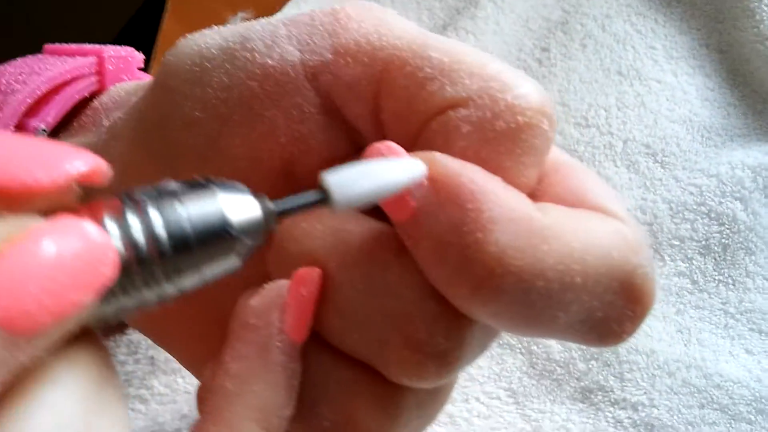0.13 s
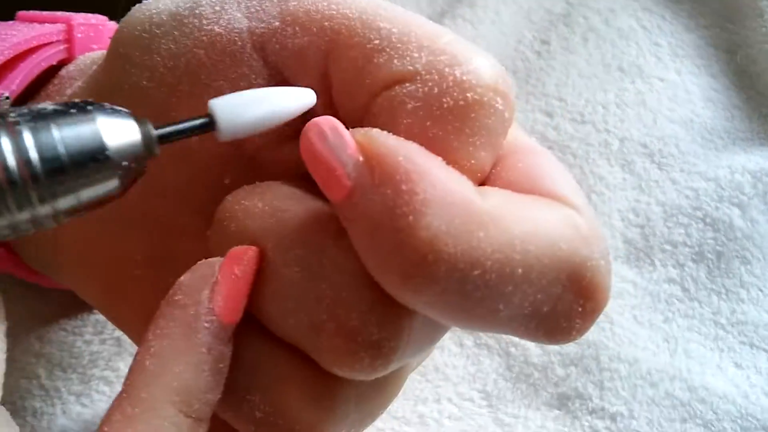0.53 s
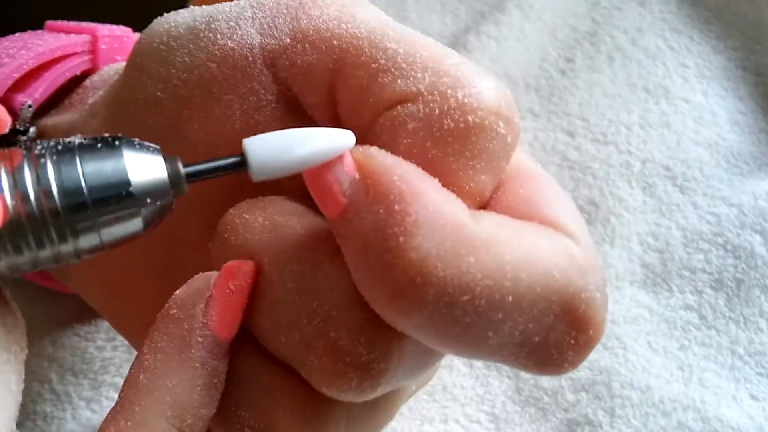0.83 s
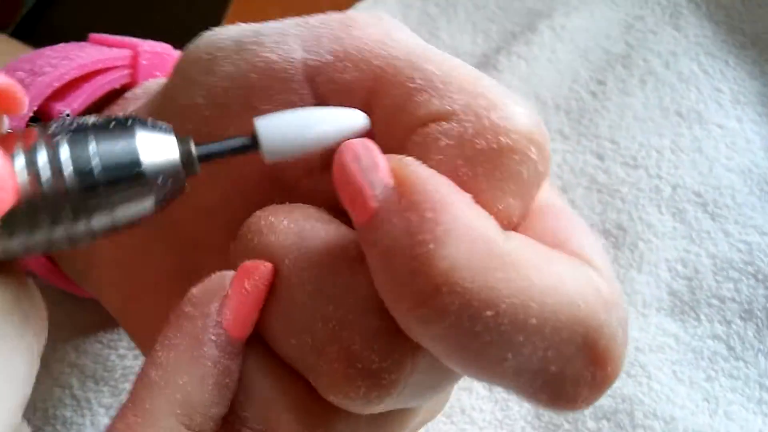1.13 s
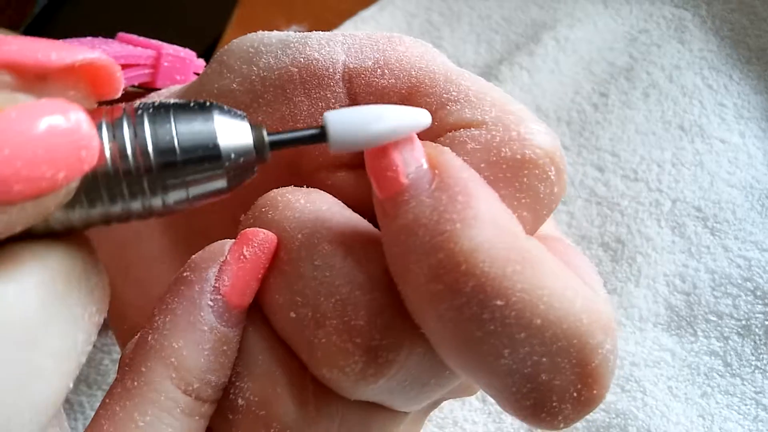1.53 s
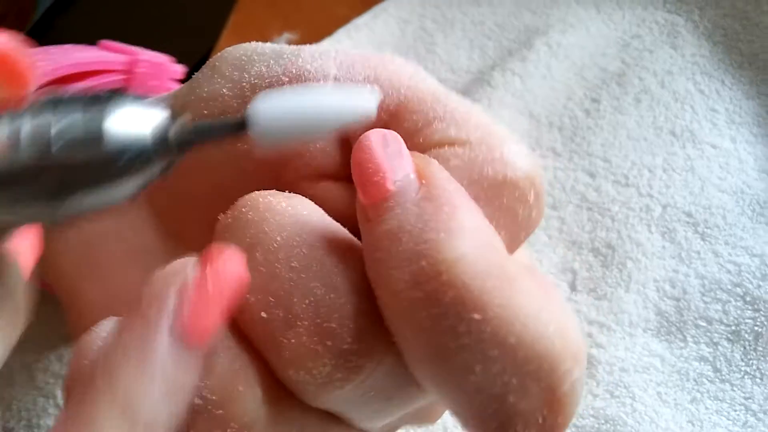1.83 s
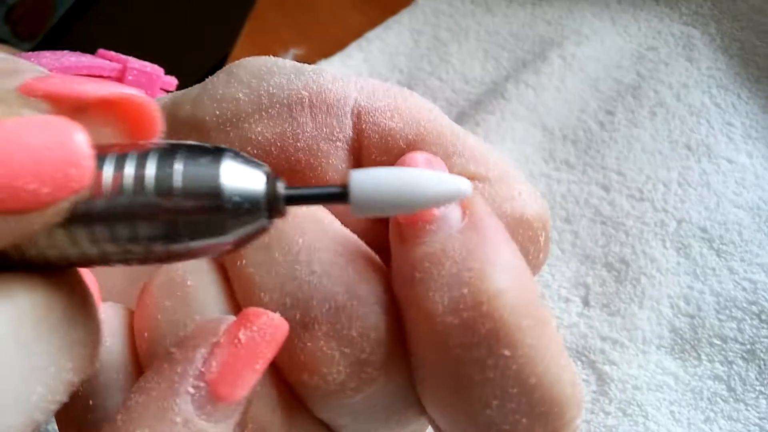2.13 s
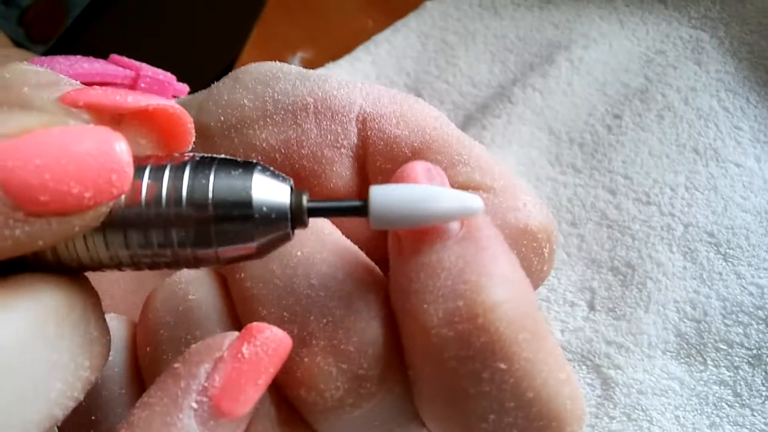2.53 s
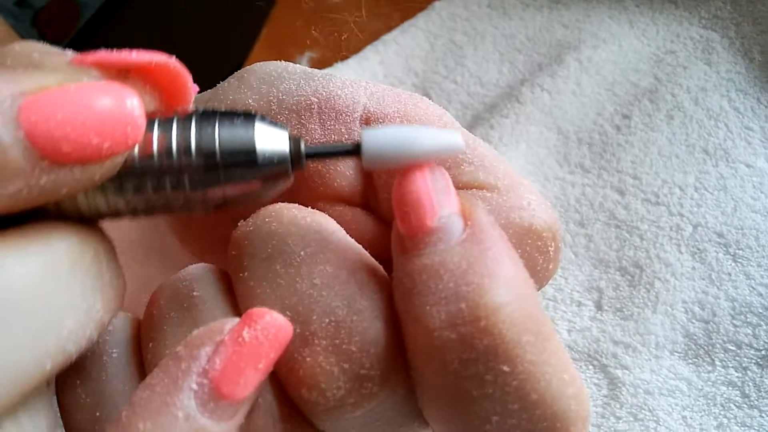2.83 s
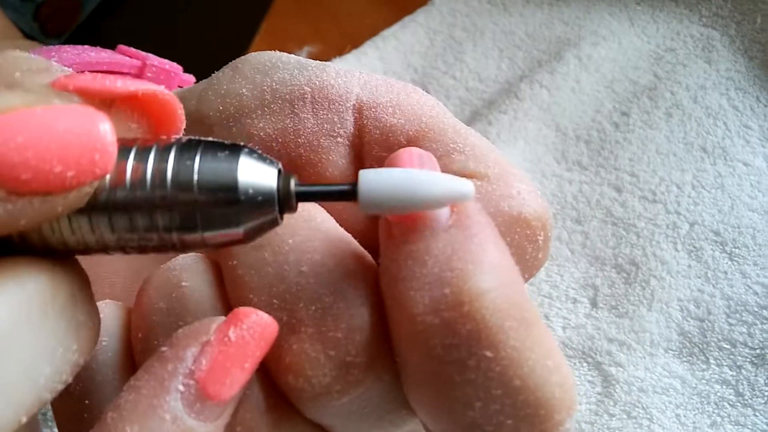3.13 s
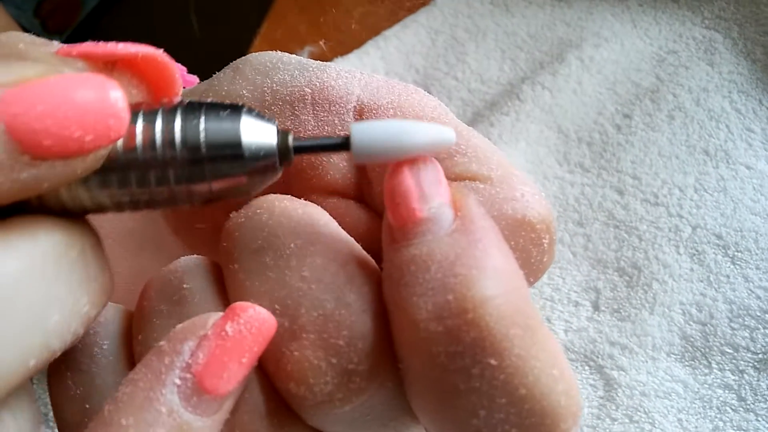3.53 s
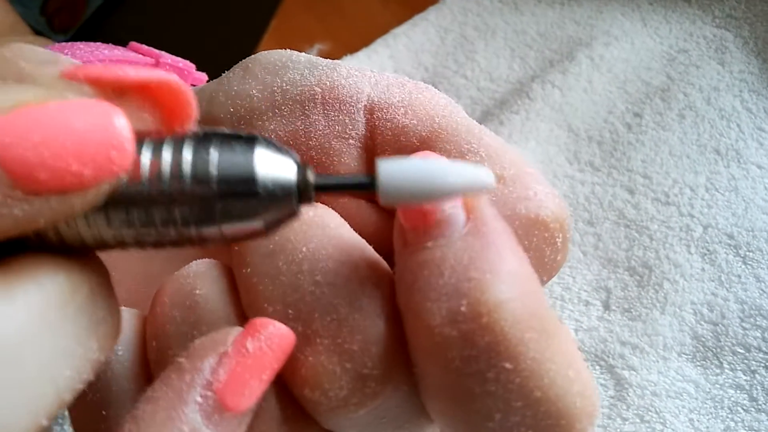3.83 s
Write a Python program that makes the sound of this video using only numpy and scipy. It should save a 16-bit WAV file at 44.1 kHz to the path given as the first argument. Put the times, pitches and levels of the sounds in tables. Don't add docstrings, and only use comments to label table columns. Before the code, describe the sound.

A small electric nail drill whines thinly and grinds a fingernail in five buzzing strokes.

```python
import sys
import numpy as np
from scipy import signal
from scipy.fft import rfft, irfft
from scipy.io import wavfile
from scipy.ndimage import uniform_filter1d

SR = 44100
rng = np.random.default_rng(int(sys.argv[2]) if len(sys.argv) > 2 else 0)


def magnitude_from_level(level_db):
    exponent = np.asarray(level_db, float) / 20
    return 10 ** exponent


def dump_mix(stems):
    frames = np.atleast_2d(stems).T
    limited = np.clip(frames, -1, 1)
    pcm = np.round(limited * 32767).astype(np.int16)
    wavfile.write(sys.argv[1], SR, pcm)


N = 176400

# [t/s, level/dB]
NEAR = [(0, 3), (.7, 3.5), (1.2, 2), (1.8, 1.5), (2.0, -1.5), (2.4, -1.5), (3.0, 2), (3.2, -3), (3.7, 2.5),
        (4, -4)]
# [t/s, order 4/dB, order 9/dB, orders 5-7/dB, order 28/dB]
SPOT = [(.12, -18, -25, -19, 5), (.25, -14, -19, -34, -1), (.36, -38.5, -6.5, -45, -5),
        (.52, -29, -24, -59, 8), (1, -41, -29, -44, 18.5), (1.65, -13, -11, -25, 11),
        (2.65, -17.5, -16, -21, -2), (2.87, -2.5, -16, -34, -4), (3.35, -30, -26, -27.5, -6),
        (3.47, -34, -9, -26, -4), (3.6, -27.5, -10, -36.5, 13)]
WANDER_DB, WANDER_PER_S = 2.2, 40


def curve(rows, col=1, rise_s=0.012, fall_s=0.033):
    t = np.arange(N) / SR
    if np.ndim(rows[0][0]) == 0:
        return np.interp(t, *np.array(rows)[:, [0, col]].T)
    quiet = -95 if col == 1 else -15
    strokes = []
    for stroke in rows:
        start = [stroke[0][0] - rise_s, quiet]
        end = [stroke[-1][0] + fall_s, quiet]
        strokes.append(np.vstack([start, np.array(stroke)[:, [0, col]], end]))
    return np.interp(t, *np.vstack(strokes).T)


def walk(rate):
    hold = int(SR / 32 / rate)
    steps = np.repeat(rng.standard_normal(300), hold)[:N // 32 + 1]
    slow = uniform_filter1d(uniform_filter1d(steps, hold), hold)
    return 1.3 * np.repeat(slow, 32)[:N]


def band(hz, width):
    f = np.arange(N // 2 + 1) * SR / N
    spectrum = rng.standard_normal(N + 2).view(complex)
    x = irfft(spectrum * np.exp(-((f - hz) / width) ** 2), N)
    return x / x.std()


def coloured(points, db, swell_db, flicker_db):
    hz, gain = np.array(points).T
    out, swell = 0, walk(2.74)
    for f in 40 * 2 ** (np.arange(26) / 3):
        if hz[0] * 0.93 < f < hz[-1] * 1.02:
            band_db = np.interp(np.log(f), np.log(hz), gain) + 10 * np.log10(f)
            moving_db = swell_db * swell + flicker_db * walk(8)
            out = out + magnitude_from_level(band_db + moving_db) * band(f, f / 5.5)
    return out * magnitude_from_level(db) / out.std()


def order_swell_db(order):
    # [t/s, length/s, shaft order, level/dB]
    order_swells = [(0.205, 0.13, 17, 7), (0.294, 0.02, 4, 10), (0.364, 0.13, 26, -10), (0.404, 0.03, 16, -10),
                    (0.404, 0.13, 31, 10), (0.424, 0.13, 18, 4), (0.464, 0.13, 14, -10), (0.524, 0.03, 12, 18),
                    (0.888, 0.045, 16, -14), (0.888, 0.09, 15, -7), (0.898, 0.13, 19, -14),
                    (0.918, 0.02, 15, -10), (0.928, 0.09, 14, 10), (1.068, 0.09, 29, 14),
                    (1.646, 0.065, 19, -14), (1.651, 0.045, 21, -7), (1.666, 0.065, 21, 14),
                    (1.676, 0.03, 29, -10), (1.705, 0.02, 4, 9), (2.569, 0.045, 18, -14), (2.629, 0.03, 12, 18),
                    (2.644, 0.09, 10, 14), (2.665, 0.03, 6, 8), (2.669, 0.065, 10, 10), (2.689, 0.13, 20, -10),
                    (2.724, 0.13, 21, 7), (2.744, 0.045, 16, -4),
                    (2.784, 0.03, 31, -20), (2.804, 0.045, 4, -4), (2.804, 0.09, 30, -7),
                    (2.809, 0.045, 28, -10), (2.819, 0.045, 19, 7), (2.819, 0.13, 23, -7),
                    (2.829, 0.02, 4, -10), (2.829, 0.02, 15, 14), (2.868, 0.02, 17, -10),
                    (2.888, 0.02, 15, -20), (3.236, 0.015, 16, 8), (3.288, 0.065, 15, -20),
                    (3.357, 0.03, 16, 7), (3.357, 0.13, 28, 10), (3.375, 0.03, 5, 12),
                    (3.407, 0.045, 17, 7), (3.43, 0.035, 6, 10), (3.437, 0.065, 27, -14),
                    (3.447, 0.13, 20, -14), (3.457, 0.03, 21, -14), (3.477, 0.03, 16, -7),
                    (3.507, 0.045, 24, -20), (3.52, 0.045, 11, 16), (3.537, 0.09, 18, 4),
                    (3.547, 0.065, 17, -7), (3.547, 0.09, 31, -10), (3.55, 0.1, 32, 22),
                    (3.557, 0.065, 19, 10), (3.577, 0.03, 26, 7), (3.577, 0.03, 28, -10),
                    (3.577, 0.045, 12, 10), (3.587, 0.065, 14, -14)]
    t = np.arange(N // 32 + 1) * 32 / SR
    total_db = np.zeros(len(t))
    for s, length, k, db in order_swells:
        if k == order:
            total_db += db * np.exp(-((t - s) / length) ** 4)
    return np.repeat(total_db, 32)[:N]


def orders(turn, levels_db, wander_db, rate, order):
    out = 0
    for k, db in enumerate(levels_db, order):
        level = np.sqrt(2) * magnitude_from_level(db + wander_db * walk(rate) + order_swell_db(k))
        phase = 2 * np.pi * rng.random() + 0.17 * walk(60)
        out = out + level * np.sin(k * turn + phase)
    return out


def tone(turn, order, wander_db):
    return orders(turn, [0], wander_db, WANDER_PER_S, order)


def shaft_turn():
    # [t/s, turns per s]
    shaft = [(0, 496.1), (.22, 495), (.37, 496.2), (.53, 493.7), (.65, 498), (.86, 500), (1.05, 495.8),
             (1.22, 500.3), (1.53, 503), (1.76, 500.8), (2.17, 502.4), (2.45, 498.6), (2.86, 493.5),
             (3.03, 498.6), (3.24, 498), (3.6, 487.6), (3.73, 497.4), (3.96, 502.1)]
    speed = uniform_filter1d(curve(shaft), 2000) + 0.25 * walk(30)
    return 2 * np.pi * np.cumsum(speed) / SR


def motor(turn):
    idle = [-68, -64, -66, -76, -62, -55, -71, -74, -77, -79, -77, -77, -72, -78, -79, -74]
    # [f/Hz, level/dB per Hz]
    hiss = [(3200, -12), (4000, -14), (4900, -6), (6300, -7), (7800, 0), (10200, -7), (11300, -19),
            (16000, -19)]
    whine = orders(turn, idle, 2.2, 5, order=16)
    whine = whine + orders(turn, [-74, -95, -60], 1.8, 7, order=8)
    whine = whine + orders(turn, [-77], 2.5, 5, order=2)
    return magnitude_from_level(curve(NEAR)) * (whine + coloured(hiss, db=-50.5, swell_db=0.5, flicker_db=1.2))


def vent():
    return magnitude_from_level(curve(NEAR) - 58 + walk(8.4)) * band(7830, 430)


def room():
    # [f/Hz, level/dB per Hz]
    floor = [(40, -10), (60, -7), (200, -12), (600, -12.5), (880, -18.5), (1500, -12), (2800, -16),
             (3200, -21.5)]
    # [f/Hz, width/Hz, level/dB]
    hums = [(115.3, 13, -64.5), (161.6, 6.5, -61), (311, 14.5, -69), (648, 35, -66), (1778, 38, -67.5),
            (2667, 157, -61.5)]
    # [t/s, length/s, f/Hz, level/dB]
    rumbles = [
        (0.184, 0.061, 89.5, -53),
        (0.474, 0.065, 95, -47.5),
        (1.886, 0.05, 99, -55),
        (2.132, 0.036, 56, -50),
        (2.306, 0.15, 73, -54),
        (3.127, 0.039, 70, -53),
        (3.89, 0.36, 79, -59),
    ]
    t, out = np.arange(N) / SR, np.zeros(N)
    for hz, width, db in hums:
        out += magnitude_from_level(db + 2.4 * walk(7)) * band(hz, width)
    for s, length, hz, db in rumbles:
        out += magnitude_from_level(db) * np.exp(-((t - s) / length) ** 2) * band(hz, hz / 2.3)
    return out + coloured(floor, db=-53.5, swell_db=0.8, flicker_db=2.2)


def flute_tones(turn):
    # [t/s, flute tone level/dB]
    press = [
        [(0.1, -42.5), (0.204, -31.5), (0.358, -24), (0.522, -33), (0.545, -41)],
        [(0.885, -61), (0.905, -33), (0.949, -24.5), (1.095, -31.5), (1.11, -44)],
        [(1.575, -47), (1.587, -41.5), (1.673, -34), (1.735, -48.5)],
        [(2.57, -63), (2.604, -42), (2.658, -33), (2.76, -30.5), (2.83, -24.5), (2.865, -43), (2.885, -33.5),
         (2.91, -48)],
        [(3.23, -58), (3.254, -49), (3.368, -29.5), (3.578, -24), (3.635, -43)],
    ]
    half, ninth, odd = (magnitude_from_level(curve(SPOT, col)) for col in (1, 2, 3))
    flutes = tone(turn, 8, wander_db=1.83)
    flutes = flutes + half * tone(turn, 4, wander_db=4.0)
    flutes = flutes + ninth * tone(turn, 9, wander_db=1.0)
    uneven = orders(turn, [-3, 0, -9], 2.2, WANDER_PER_S, order=5)
    flutes = flutes + odd * (uneven + magnitude_from_level(-9) * tone(turn, 3, wander_db=3.0))
    flutes = flutes + magnitude_from_level(-27) * band(4030, 830)
    return magnitude_from_level(curve(press, rise_s=0.017, fall_s=0.13)) * flutes


def scrape(turn, slide):
    # [t/s, scrape level/dB, sharpness/dB]
    bite = [
        [(0.0, -48.5, -14), (0.076, -39.5, -22), (0.198, -42, -14), (0.472, -29.5, -14), (0.53, -37, -3)],
        [(0.885, -41.5, -14), (0.901, -43.5, -11), (0.973, -39, -18), (1.051, -39, -3.5), (1.098, -36.5, -5)],
        [(1.57, -43.5, -19), (1.604, -36, -13), (1.652, -32, -10), (1.71, -32, -7), (1.725, -36, -5)],
        [(2.44, -66, -1), (2.442, -77, -6), (2.588, -37, -19), (2.886, -29, -2.5), (2.9, -33.5, 2)],
        [(3.228, -41, -24), (3.304, -45, -14), (3.346, -34.5, -16.5), (3.586, -25.5, -4), (3.62, -27.5, -7)],
    ]
    # [t/s, order 10/dB re scrape, order 15/dB re scrape]
    lean = [(.2, -32, -10), (.45, -10.5, -0.5), (.53, -12, -28), (.9, -2.5, 9), (1.08, -9, -25),
            (1.65, -21, -20), (2.7, -29.5, -29), (2.82, -38, -22), (3.3, -13, -6), (3.42, -18, -18),
            (3.53, -17, -7), (3.62, -26, -25)]
    lower = [-40, -26, -31, -15]
    upper = [-3, -12, -14.5, -16, -9.5, -41]
    edge_orders = [-12, -14, -11, -14, -12, -11, -8, -12, -16, -16, -40]
    t = np.arange(N) / SR
    puff = (1 + 0.5 * np.cos(turn)) * magnitude_from_level(2.1 * walk(68))

    body = orders(slide, lower, WANDER_DB, WANDER_PER_S, order=11)
    body = body + orders(slide, upper, WANDER_DB, WANDER_PER_S, order=16)
    body = body + magnitude_from_level(curve(lean)) * tone(turn, 10, wander_db=1.5)
    body = body + magnitude_from_level(curve(lean, col=2)) * tone(turn, 15, wander_db=5.5)
    body = body + magnitude_from_level(-19) * puff * band(7400, 780)

    edge = orders(slide, edge_orders, 1.2 * WANDER_DB, WANDER_PER_S, order=22)
    edge = edge + magnitude_from_level(-13 + curve(SPOT, col=4)) * tone(turn, 28, wander_db=6.5)
    edge = edge + magnitude_from_level(-14) * puff * band(20000, 2600)

    touch_s = 3.965
    touch_db = -40.5 - 300 * np.abs(t - touch_s - 0.01) - 1200 * np.maximum(touch_s - t, 0)
    scrape_db = np.maximum(curve(bite, rise_s=0.0071, fall_s=0.054), touch_db)
    return magnitude_from_level(scrape_db) * (body + magnitude_from_level(curve(bite, col=2)) * edge)


def bit(turn):
    # [t/s, flick level/dB, dust level/dB]
    lifts = [
        (0.529, -31, -47),
        (1.093, -29.5, -42),
        (1.719, -39.5, -47),
        (2.902, -51, -47),
        (3.622, -45, -36),
    ]
    t = np.arange(N) / SR
    bumps = [np.exp(-((t - row[0]) / 0.01086) ** 2) for row in lifts]
    slide = turn + 2 * np.pi * 4.56 * np.cumsum(sum(bumps)) / SR
    singing = flute_tones(turn)
    scraping = scrape(turn, slide)
    ring = band(3960, 90)
    dust = 2 * band(11500, 4000) * np.cos(turn / 2) ** 10
    flick = sum(bump * (magnitude_from_level(row[1]) * ring + magnitude_from_level(row[2]) * dust) for bump, row in zip(bumps, lifts))
    off = sum((t > row[0] + 0.007) & (t < row[0] + 0.1) for row in lifts)
    return singing + magnitude_from_level(-14 * off) * (scraping + flick)


def ticks():
    # [t/s, peak level/dB]
    bounces = [
        (.0573, -25),
        (.0787, -21),
        (.0985, -27),
        (.106, -29),
        (.1175, -35),
        (.1295, -37),
    ]
    # [f/Hz, level/dB, t60/s]
    modes = [(1740, 1, .028), (2300, -7, .015), (3800, -1, .025), (5500, -9, .008), (7150, -6, .018),
             (10500, -15, .006)]
    out, t = np.zeros(N), np.arange(2205) / SR
    for s, db in bounces:
        push = rng.standard_normal(len(t)) * np.exp(-t / 0.0035)
        ring = np.zeros(len(t))
        for hz, mode_db, t60 in modes:
            level = magnitude_from_level(mode_db + 2 * rng.standard_normal())
            ring += level * np.sin(2 * np.pi * hz * t) * 1000 ** (-t / t60)
        hit = np.convolve(np.diff(push), ring)[:len(t)]
        start = int(s * SR)
        out[start:start + len(t)] += magnitude_from_level(db) * hit / np.abs(hit).max()
    return out


def scene():
    turn = shaft_turn()
    return (motor(turn) + bit(turn) + ticks() + room() + vent())[None]


def top_cut(x):
    return signal.sosfilt(signal.butter(12, 16220, fs=SR, output="sos"), x)


def record(dry):
    split_hz, notch_width_hz, mirror_width_hz = 4000, 39.5, 110
    f = np.arange(N // 2 + 1) * SR / N
    spec, off = rfft(dry[0]), f - split_hz
    mirror = np.conj(spec[np.abs(round(2 * split_hz * N / SR) - np.arange(len(f)))])
    dip = 1 - 0.87 * np.exp(-(off / notch_width_hz) ** 2)
    spec = spec * dip + mirror * np.exp(-(off / mirror_width_hz) ** 2)
    lowpass = signal.ellip(8, 0.2, 70, 15750, fs=SR, output="sos")
    x = signal.sosfilt(lowpass, irfft(spec, N))
    return top_cut(x[None])


dry = scene()
out = record(dry)
dump_mix(out)
```